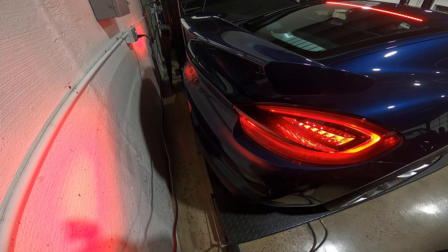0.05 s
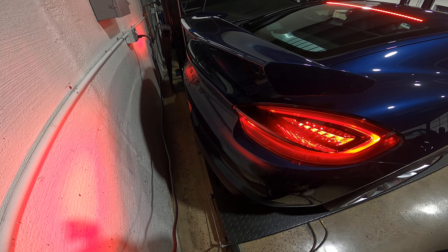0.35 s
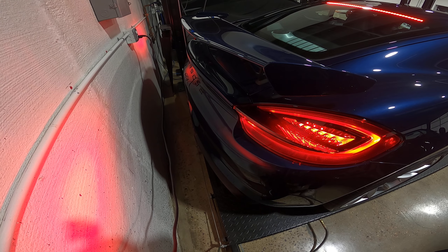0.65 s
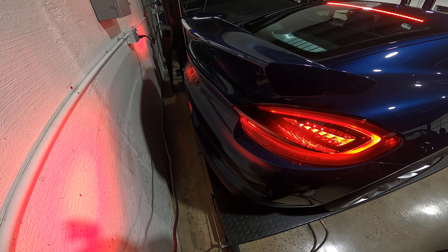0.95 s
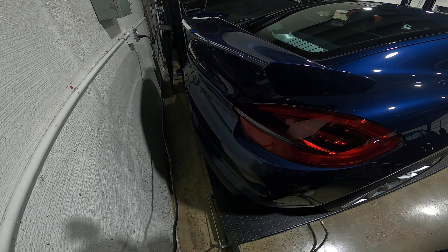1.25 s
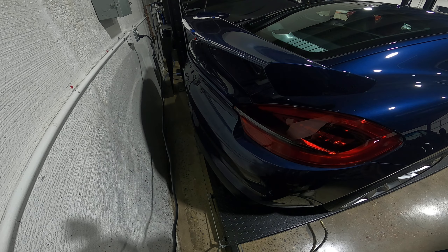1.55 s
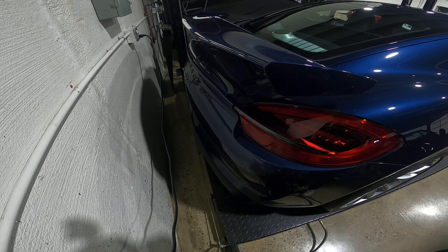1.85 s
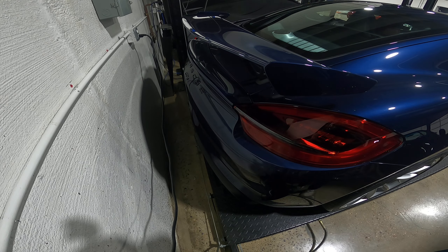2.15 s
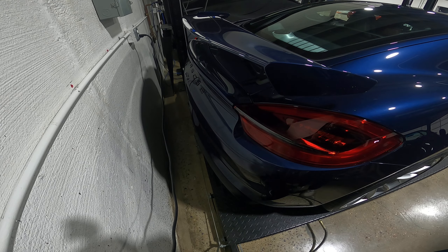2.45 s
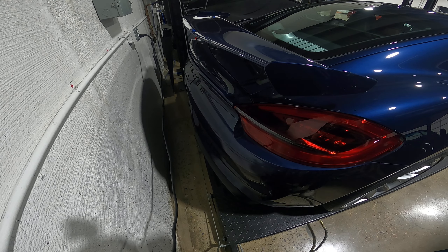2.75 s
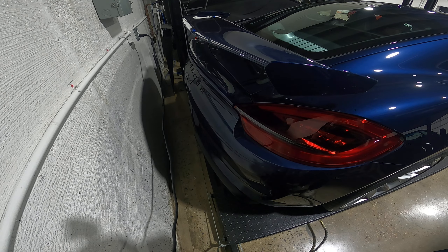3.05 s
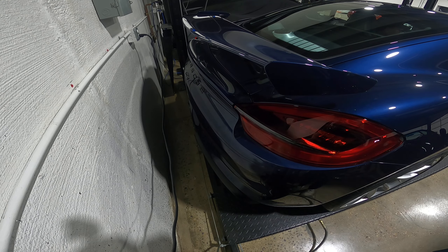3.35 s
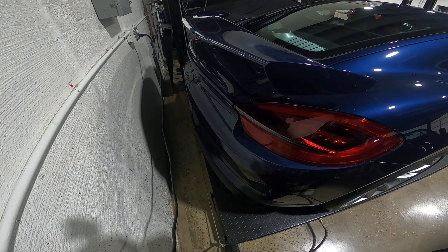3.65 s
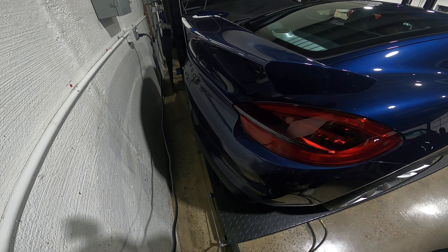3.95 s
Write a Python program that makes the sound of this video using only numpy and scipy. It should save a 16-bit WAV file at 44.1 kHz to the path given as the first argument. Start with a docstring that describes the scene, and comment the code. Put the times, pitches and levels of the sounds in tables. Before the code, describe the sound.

A six-cylinder sports car idles fast and steadily in a garage, heard from beside its tail. The deep exhaust hum carries uneven thumping, a metallic pipe rasp and light ticking over a constant hiss, with a short echo.

```python
"""A six-cylinder sports car idles fast in a garage, heard from beside its tail.
The firings blend into a deep exhaust hum, thump unevenly in the silencer, set the engine metal
ticking and ring the pipes with a metallic rasp. Exhaust flow and fans lay a steady hiss underneath,
and the close walls add a short echo to the ticks and the pipes."""
import sys
import numpy as np
from scipy import signal
from scipy.fft import rfft, irfft
from scipy.io import wavfile
from scipy.ndimage import uniform_filter1d

SR = 44100
rng = np.random.default_rng(int(sys.argv[2]) if len(sys.argv) > 2 else 0)


def waveform_to_disk(signal):
    """Save audio, clipped to [-1, 1], as 16-bit WAV at the path in sys.argv[1]."""
    frames = np.transpose(np.atleast_2d(signal))
    scaled = np.clip(frames, -1, 1) * 32767
    samples = np.round(scaled).astype(np.int16)
    wavfile.write(sys.argv[1], SR, samples)


N = 176400

# accent of each cylinder, in firing order: thud/dB, rasp/dB, tick/dB
CYLINDER_ACCENTS = [(2.5, -3, 1), (8, -1.5, 1.5), (-3.5, -3.5, 1), (0, -3, 0.5), (3.5, -1.5, 2),
                    (1.5, -2.5, 3)]


def undb(db):
    """Decibels to gain."""
    return 10 ** (np.asarray(db) / 20)


def unit(x):
    """Scale to rms 1."""
    return x / np.sqrt(np.mean(x ** 2))


def curve(table):
    """One envelope per value column of a time table, in straight ramps."""
    times, *columns = np.array(table).T
    return [np.interp(np.arange(N) / SR, times, column) for column in columns]


def colour(x, points):
    """EQ along a curve of points: f/Hz, gain/dB."""
    hz, db = np.array(points).T
    f = np.maximum(np.arange(N // 2 + 1) * SR / N, 1)
    return irfft(rfft(x) * undb(np.interp(np.log(f), np.log(hz), db)), N)


def resonate(x, modes):
    """Steep resonators in parallel; neighbours swing in opposite directions."""
    out = 0
    for k, (hz, width, db) in enumerate(modes):
        b, a = signal.iirpeak(hz, hz / (1.5 * width), fs=SR)  # two passes narrow it to about `width`
        out = out + (-1) ** k * undb(db) * signal.lfilter(b, a, signal.lfilter(b, a, x))
    return out


def drift(rate_hz):
    """Smooth random wander at rms 1."""
    hold = int(SR / rate_hz)
    steps = np.repeat(rng.standard_normal(N // hold + 1), hold)
    return unit(uniform_filter1d(uniform_filter1d(steps, hold), hold)[:N])


def pan(x, lean_db):
    """Lean a sound to the left."""
    return x * undb(np.array([[lean_db], [-lean_db]]) / 2)


def exhaust_hum(phase):
    """The firings fuse into a deep boom with overtones; a faint belt tone rides on top."""
    # hum envelopes, before trim: t/s, boom level/dB, octave level/dB
    hum_levels = [(0.06, -13, -34), (0.31, -12.5, -34.5), (0.4, -15, -28), (1.01, -12.5, -32.5),
                  (1.03, -12, -34), (2.24, -12.5, -32.5), (2.42, -13.5, -28.5), (2.81, -12.5, -34.5),
                  (2.97, -12.5, -32.5), (3.94, -12.5, -32.5)]
    # weaker partials: multiple of the six-firing cycle, level/dB
    overtones = [(3, -46), (9, -47), (16, -47.5), (18, -37), (20, -42), (22, -49), (24, -30.5), (27, -51.5),
                 (30, -53), (32, -55), (36, -46.5), (42, -45), (78, -44)]

    def tone(multiple, lag=0):
        return np.sqrt(2) * np.cos(2 * np.pi * multiple * (phase - lag))

    boom_db, octave_db = curve(hum_levels)
    boom = undb(boom_db - 0.45 + 0.14 * drift(14)) * tone(0.99)  # just under the firing rate
    octave = undb(octave_db + 2.5) * tone(2)
    upper = sum(undb(db + 0.67 * drift(8.2)) * tone(order / len(CYLINDER_ACCENTS), lag=0.15)
                for order, db in overtones)
    belt = undb(-49.5) * tone(6.41)
    return pan(boom, lean_db=0.7) + octave + upper + belt


def air_hiss(phase):
    """Wide hiss of exhaust flow and fans, pulsing slightly with the firings."""
    # tone of the rushing air: f/Hz, relative level/dB
    spectrum = [(25, 11), (80, 10.5), (250, 10.5), (450, 6), (900, 7), (1500, 4.5), (2200, 4), (3000, 1),
                (3700, -2), (5100, -2.4), (6000, -5.5), (7600, -8), (8200, -13), (9500, -16), (11200, -23),
                (12400, -23), (15500, -38)]
    # stereo width: f/Hz, side minus mid/dB
    spread = [(100, -35), (300, -22), (600, -11), (2000, -6.5), (4000, -5), (8000, -2.6), (13000, -2.2)]
    # stereo balance: f/Hz, left minus right/dB
    lean = [(300, 0), (1000, 1.7), (4000, .4), (8000, -1.7), (13000, -2.5)]
    # faint whistles in the hiss: f/Hz, width/Hz, relative level/dB
    whistle_modes = [(3283, 29, 3), (4446, 180, -7), (5370, 45, -2), (7550, 74, -6)]
    # slow swell of the hiss: t/s, gain/dB
    swell = [(0, 0.8), (.55, -0.3), (.8, 1.4), (1.05, 0.7), (1.3, 0), (2.1, 1.05), (2.6, 1.25), (3.2, 0.5),
             (4, 1)]
    mid, side, whistle_noise = rng.standard_normal((3, N))
    side = colour(side, spread)
    ears = [colour(mid + sign * side, [(hz, sign * db / 2) for hz, db in lean]) for sign in (1, -1)]
    rush = unit(colour(np.array(ears), spectrum))
    whistles = undb(-18) * unit(resonate(whistle_noise, whistle_modes))
    firing_db = 0.5 * np.cos(2 * np.pi * (phase - 0.3))
    cycle_db = 0.5 * np.cos(2 * np.pi * (phase - 2.3) / len(CYLINDER_ACCENTS))
    flutter_db = firing_db + cycle_db + 0.75 * drift(18)
    return (rush + whistles) * undb(flutter_db + curve(swell)[0])


def firings(phase, accents_db, scatter_db, jitter_s, puff_s, puff_db, rise_s=0.0014):
    """One push per firing, its strength set by the cylinder, followed by a puff of turbulence."""
    def decay(x, seconds):
        return signal.lfilter([1], [1, -np.exp(-1 / (seconds * SR))], x)

    beats = np.flatnonzero(np.diff(np.floor(phase)) > 0)
    cylinder = np.floor(phase[beats + 1]).astype(int) % len(accents_db)
    strength, lateness = rng.standard_normal((len(beats), 2)).T
    onsets = np.clip(beats + (lateness * jitter_s * SR).astype(int), 0, N - 1)
    pushes = np.zeros(N)
    pushes[onsets] = undb(accents_db[cylinder] + scatter_db * strength)
    puffs = decay(decay(pushes, puff_s), rise_s) * rng.standard_normal(N)
    return unit(pushes) + undb(puff_db) * unit(puffs)


def silencer_thuds(phase, accents_db):
    """Unequal firings thump in the silencer."""
    modes = [(176.2, 61, 4.5), (292, 110, -17.5)]  # f/Hz, width/Hz, relative level/dB
    drive = firings(phase - 0.3, accents_db, scatter_db=0.5, jitter_s=0.00055, puff_s=0.0054, puff_db=4.5)
    return unit(resonate(drive, modes))


def engine_ticks(phase, accents_db):
    """A brief rattle of engine metal with every firing."""
    # ringing engine metal: f/Hz, width/Hz, relative level/dB
    modes = [(1795, 96, -8), (1876, 37, 1.5), (1927, 56, -0.5), (2293, 95, -3), (2351, 89, 1),
             (2660, 112, -1.5)]
    drive = firings(phase + 0.15, accents_db, scatter_db=1.35, jitter_s=0.0004, puff_s=0.0077, puff_db=15)
    return pan(garage(resonate(drive, modes), echo_db=-11.5), lean_db=0.9)


def tailpipe_rasp(phase, accents_db):
    """Each gas pulse rings the tailpipes with a metallic midrange bite."""
    # tailpipe resonances: f/Hz, width/Hz, relative level/dB
    modes = [(563, 80, -13), (648.5, 69, -3), (713, 28.3, -1), (781.3, 53.6, 4.5), (821, 31, -5)]
    drive = firings(phase, accents_db, scatter_db=0.78, jitter_s=0.00017, puff_s=0.0072, puff_db=4)
    return pan(garage(resonate(drive, modes), echo_db=-17.5), lean_db=1.5)


def pipe_ring(phase, accents_db):
    """The gas pulses also excite a thinner ring above the rasp."""
    # upper pipe resonances: f/Hz, width/Hz, relative level/dB
    modes = [(1074, 42, -0.5), (1114, 36, 0.5), (1167.3, 25, 4), (1368, 41, -9), (1575, 33, -6)]
    drive = firings(phase - 0.03, accents_db,
                    scatter_db=1.5, jitter_s=0.00016, puff_s=0.0084, puff_db=1.5)
    return pan(garage(resonate(drive, modes), echo_db=-14), lean_db=2.0)


def garage(x, echo_db, t60_s=0.56, predelay_s=0.004):
    """Direct sound plus a short wash off the walls, opposite in polarity at each ear for width."""
    t = np.arange(SR // 2) / SR
    response = rng.standard_normal(len(t)) * np.exp(-np.log(1000) * t / t60_s) * (t > predelay_s)
    echo = unit(signal.fftconvolve(x, response)[:N])
    return unit(x) + undb(echo_db) * echo * np.array([[1], [-1]])


def scene():
    """Mix the layers, all locked to the wavering engine speed."""
    # idle speed: t/s, firing rate/Hz
    idle_speed = [(0.0, 52.54), (0.17, 55.11), (0.3, 51.85), (0.42, 52.21), (0.54, 55.04), (0.66, 53.43),
                  (0.8, 54.03), (1.0, 54.26), (1.25, 54.97), (1.52, 55.38), (1.72, 54.34), (2.05, 54.86),
                  (2.35, 56.3), (2.65, 55.05), (3.0, 54.74), (3.25, 55.41), (3.55, 55.01), (4.0, 55.15)]
    # fader rides, before trim: t/s, thuds/dB, rasp/dB, pipe ring/dB, ticks/dB
    faders = [(0.0, -34.5, -27.5, -41.0, -38.5), (0.2, -33.0, -30.0, -37.0, -41.0),
              (0.4, -30.5, -32.0, -36.5, -39.5), (0.65, -31.5, -26.5, -34.5, -38.0),
              (0.85, -33.0, -29.5, -34.5, -39.0), (1.05, -32.0, -29.0, -37.5, -37.5),
              (1.3, -38.0, -30.5, -35.0, -40.0), (1.5, -37.0, -31.5, -38.0, -38.5),
              (1.75, -32.5, -31.0, -35.0, -39.5), (2.2, -36.5, -31.5, -38.5, -39.5),
              (2.55, -33.5, -31.5, -34.0, -36.5), (2.75, -34.0, -31.0, -39.0, -39.5),
              (2.95, -34.0, -31.5, -31.5, -39.0), (3.08, -34.5, -33.0, -41.0, -36.5),
              (3.22, -35.5, -30.0, -34.0, -38.5), (3.42, -33.5, -31.5, -40.5, -39.5),
              (3.75, -35.0, -31.0, -35.5, -38.0), (4.0, -34.5, -31.5, -38.5, -37.0)]
    firing_hz, = curve(idle_speed)
    phase = np.cumsum(firing_hz) / SR - 0.0137 * firing_hz[0]  # counts firings, from zero at 13.7 ms
    thud_db, rasp_db, ring_db, tick_db = curve(faders)
    thud_accents, rasp_accents, tick_accents = np.array(CYLINDER_ACCENTS).T
    hum = exhaust_hum(phase)
    hiss = undb(-33.5) * air_hiss(phase)
    thuds = undb(thud_db - 2.5) * silencer_thuds(phase, thud_accents)
    rasp = undb(rasp_db - 0.4) * tailpipe_rasp(phase, rasp_accents)
    ring = undb(ring_db + 0.5) * pipe_ring(phase, rasp_accents)
    ticks = undb(tick_db + 0.73) * engine_ticks(phase, tick_accents)
    return hum + hiss + thuds + rasp + ring + ticks


def record(dry):
    """A steep low-pass at 15650 Hz trims the very top of the hiss."""
    return signal.sosfilt(signal.ellip(8, 0.1, 70, 15650, fs=SR, output="sos"), dry)


dry = scene()
out = record(dry)
waveform_to_disk(out)
```